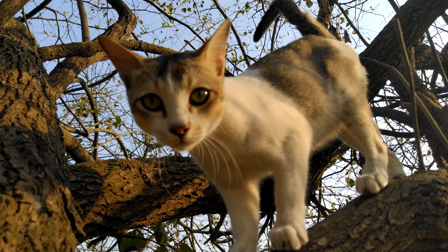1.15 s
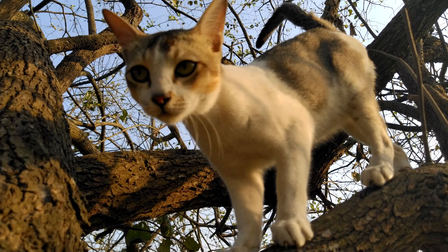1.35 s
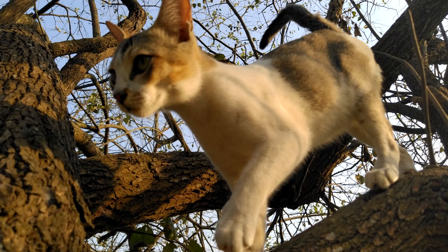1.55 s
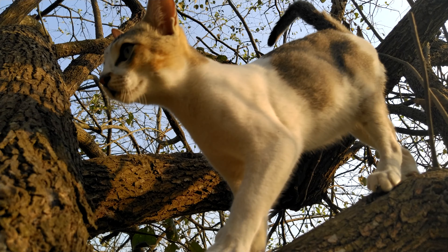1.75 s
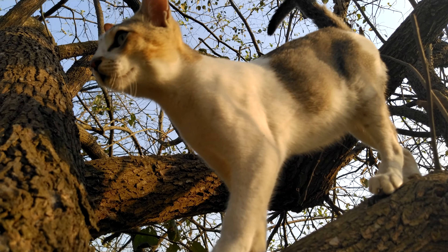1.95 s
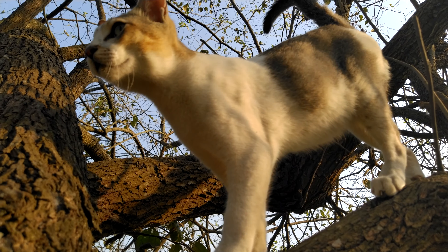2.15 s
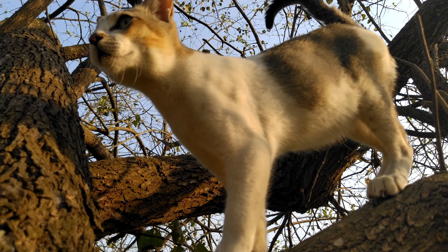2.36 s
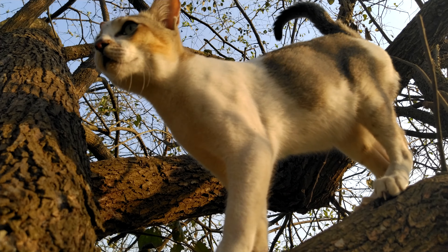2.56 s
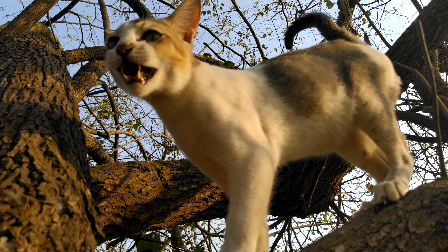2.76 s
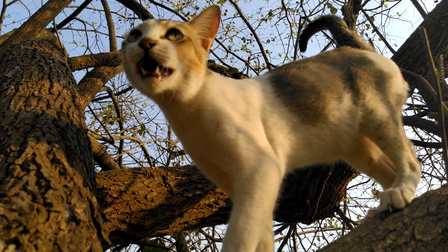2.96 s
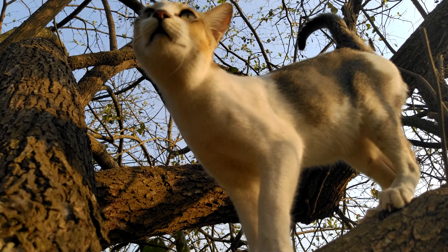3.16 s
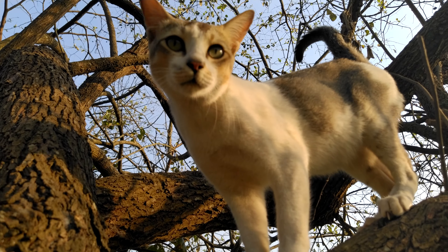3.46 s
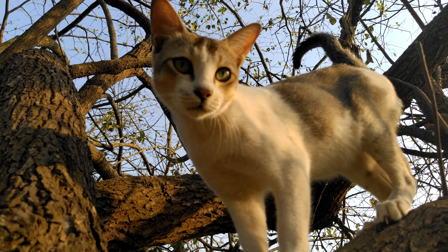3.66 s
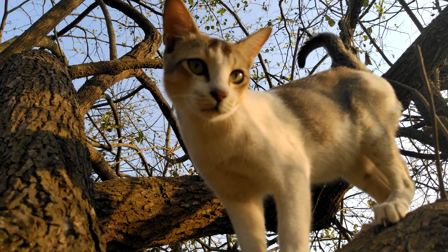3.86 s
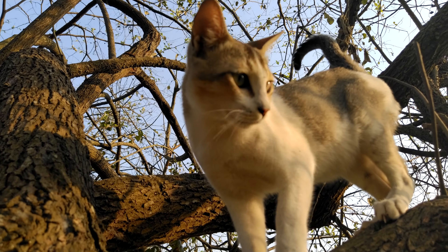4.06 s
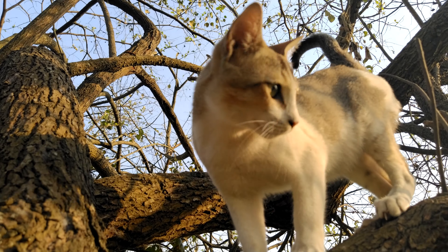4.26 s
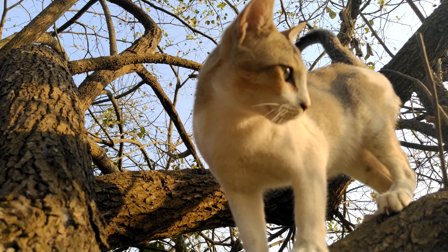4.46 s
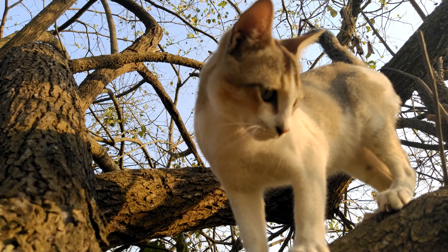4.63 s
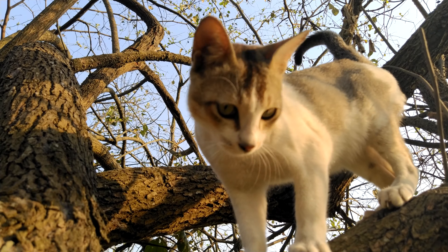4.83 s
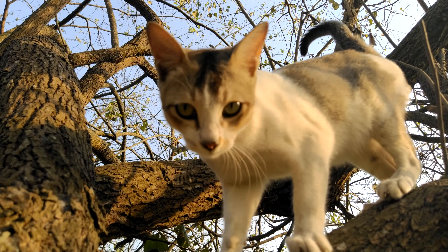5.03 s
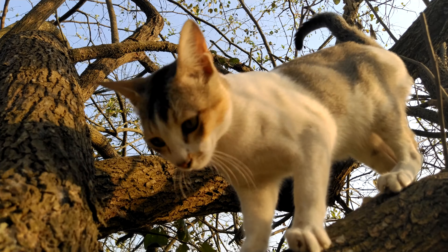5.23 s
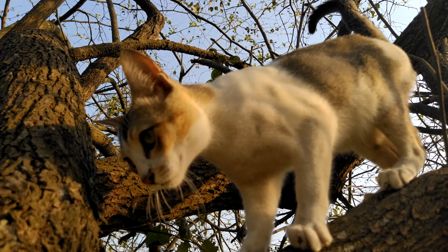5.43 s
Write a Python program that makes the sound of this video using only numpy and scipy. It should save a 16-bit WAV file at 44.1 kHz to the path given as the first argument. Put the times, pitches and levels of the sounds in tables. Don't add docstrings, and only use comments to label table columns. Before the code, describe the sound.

Claws scrape and snap dry bark close by, a paw thuds, then one short rising meow amid faint bird trills and soft open air.

```python
import sys
import numpy as np
from scipy import signal
from scipy.io import wavfile
from scipy.ndimage import uniform_filter1d

SR = 44100
rng = np.random.default_rng(int(sys.argv[2]) if len(sys.argv) > 2 else 0)


def persist_wave(psi):
    counts = np.round(np.clip(psi, -1, 1) * 32767).astype(np.int16)
    wavfile.write(sys.argv[1], SR, np.atleast_2d(counts).T)


def invert_db(level):
    return 10 ** (np.asarray(level, dtype=float) / 20)


N = 246519
TIME = np.arange(N) / SR

# [start_s, level_db]
RUSTLE = [(0.0, -46.5), (0.15, -64), (0.34, -64.5), (0.4, -52), (0.56, -54), (0.61, -54), (0.75, -56.5),
          (0.89, -60), (1.09, -68), (1.2, -72.5), (1.51, -73), (1.87, -77.5), (5.59, -81)]
# [centre_hz, width_hz, level_db]
BRIGHT_MODES = [(9900, 1040, -4.5), (7400, 2000, -10), (11100, 1600, -4.5), (4970, 2300, -9)]
# [centre_hz, width_hz, level_db]
BARK_MODES = [(2315, 2100, 4), (3100, 1740, 8), (4380, 3800, -14), (1470, 490, 3)]


def curves(table):
    s, *columns = np.transpose(table)
    return [np.interp(TIME, s, c) for c in columns]


def along(points, hz):
    f, v = np.transpose(points)
    return np.interp(np.log(hz), np.log(f), v)


def ring(x, hz, width_hz):
    return signal.lfilter(*signal.iirpeak(hz, hz / width_hz, fs=SR), x)


def rings(x, modes):
    return sum((-1) ** k * invert_db(db) * ring(x, hz, width_hz) for k, (hz, width_hz, db) in enumerate(modes))


def walk(rate_hz):
    hold = int(SR / rate_hz)
    steps = np.repeat(rng.standard_normal(N // hold + 1), hold)
    return 1.3 * uniform_filter1d(uniform_filter1d(steps, hold), hold)[:N]


def add(out, start_s, sound):
    i = max(int(start_s * SR), 0)
    out[:, i:i + sound.shape[-1]] += sound[..., :N - i]


def echoes(x, t60_s, wet_db):
    t = np.arange(int(t60_s * SR)) / SR
    tail = rng.standard_normal((2, len(t))) * invert_db(-60 * t / t60_s) * (t > .003)
    tail = tail / np.sqrt(np.sum(tail[0] ** 2))
    return x + invert_db(wet_db) * signal.fftconvolve(x, tail, axes=1)[:, :N]


def stray_flakes():
    chance = rng.standard_normal((60, 3))
    times_s = np.sort(rng.uniform(0, 1.1, size=len(chance)))
    effort_db = np.interp(times_s, *np.transpose(RUSTLE))
    return [(s, db + 20 + 5 * a, -18 + 6 * b, 9900 + 800 * c)
            for s, db, (a, b, c) in zip(times_s, effort_db, chance)]


def snap(t, peak_db, woody_db, flake_hz):
    shade_db = 12.5 + rng.standard_normal()
    slips_s = np.append([.003, .0012], rng.uniform(0.00383, 0.00698, size=3))
    sizes = np.append(1, invert_db(-17 + 3 * rng.standard_normal(size=4)))
    since_s = np.maximum(t[:, None] - slips_s, 0)
    force = (np.minimum(since_s / 0.00014, 1) * np.exp(-since_s / 0.00047)) @ sizes
    jolt = ((since_s > 0) * np.exp(-since_s / 0.00005)) @ sizes
    tear = force * rng.standard_normal((3, len(t)))
    crisp = rings(tear[:2], BRIGHT_MODES + [(flake_hz, 1100, 4)])
    woody = rings(jolt + 0.25 * tear[2], BARK_MODES)
    crisp[1] = signal.lfilter(*signal.butter(4, 9000, fs=SR), crisp[1])
    crisp_db = np.array([[peak_db], [peak_db - shade_db]])
    crisp = crisp / np.abs(crisp).max(axis=1, keepdims=True) * invert_db(crisp_db)
    woody = woody / np.abs(woody).max() * invert_db(peak_db + woody_db)
    return crisp + [woody, -invert_db(-.3 * shade_db) * np.roll(woody, 7)]


def thud(t, peak_db):
    modes = ((426, 0.0067, 0.11), (546, 0.0018, 0.8), (805, 0.0011, 0.7))  # hz, decay_s, size
    limb = sum(size * np.exp(-t / decay_s) * np.sin(2 * np.pi * hz * t) for hz, decay_s, size in modes)
    return invert_db(peak_db) * np.minimum(t / 0.00055, 1) * np.array([limb, 0.96 * np.roll(limb, 4)])


def claws():
    # [start_s, peak_db, woody_db re peak, flake_hz]
    snaps = [(0.0002, -25.5, -15.5, 11500), (0.017, -28, -31, 8350), (0.026, -29, -37, 10600),
             (0.0424, -27, -7, 8400), (0.055, -21.5, -9.5, 10200), (0.072, -14.5, -26, 8700),
             (0.0978, -9.5, -20.5, 9900), (0.1136, -9, -17.5, 10600), (0.1584, -26.5, -12.5, 9800),
             (0.1935, -33.5, -30, 10100), (0.243, -35.5, -9.5, 9900), (0.3024, -38, -29, 9300),
             (0.326, -34, -16, 10200), (0.3497, -31.5, -11, 10000),
             (0.3864, -31.5, -6.5, 10600), (0.396, -21, -29, 9350), (0.4225, -40, -23, 10200),
              (0.4611, -3.5, -12, 9900), (0.4729, -13, -26, 10200), (0.4947, -25.5, -12.5, 9600),
              (0.506, -31, -9, 9500), (0.542, -27.5, -27, 10600), (0.5486, -22.5, -7, 9900),
              (0.589, -26.5, -21, 7400), (0.6354, -28, -9, 10000), (0.6505, -25, -8.5, 9100),
              (0.656, -28, -18, 9700), (0.678, -16.5, -22, 9600), (0.6831, -23.5, -29, 10000),
              (0.712, -25.5, -17, 10500), (0.734, -16, -24, 7400), (0.7455, -14, -15.5, 9900),
              (0.7595, -24.5, -17, 9400), (0.7653, -25.5, -8.5, 8950), (0.7937, -31.5, -14, 6660),
              (0.878, -30.5, -31, 6600), (0.893, -27.5, -7.5, 7900), (0.926, -35.5, -12, 9400),
              (0.94, -34.5, -8.5, 10000), (0.9703, -19.5, -46, 10500), (0.9991, -30, -22, 9100),
              (1.0719, -36, -27, 9450),
             (1.316, -40, -34, 10600), (1.4079, -26.5, -18, 10000), (1.469, -30.5, -43, 10200),
              (1.53, -24, -50, 9900), (1.577, -37.5, -21, 7270), (1.6093, -36, -27, 10400),
              (1.614, -33.5, -27, 9900), (1.749, -39.5, -18, 10100), (2.3695, -42, -10, 10000),
              (2.457, -37.5, -25, 8500), (2.67, -34, -30, 9800), (3.6338, -45, -24, 10500),
              (3.6905, -44, -19, 10000), (2.846, -37, -27, 9600), (2.8652, -34.5, -35, 8650),
              (2.9981, -37, -29, 11510), (3.3738, -34, -28, 10700), (3.7915, -39, -24, 8400),
              (3.821, -41, -16, 11500), (3.8543, -30, -25, 10500), (3.8616, -22.5, -30, 11100),
              (3.9417, -20.5, -24.5, 10230), (4.5349, -39.5, -11, 10100), (4.7508, -40.5, -24, 8500),
              (4.7598, -39, -26, 5800), (4.9717, -44.5, -6.5, 9200), (5.2117, -38.5, -11, 8160)]
    # [start_s, peak_db]
    thuds = [
        (0.041, -43),
        (0.113, -49),
        (0.4589, -23.5),
        (0.548, -44.5),
        (.745, -48),
    ]
    out, t = np.zeros((2, N)), np.arange(700) / SR
    for s, peak_db, woody_db, flake_hz in snaps + stray_flakes():
        add(out, s - .0033, snap(t, peak_db, woody_db, flake_hz))
    for s, peak_db in thuds:
        add(out, s, thud(t, peak_db))
    highpass = signal.butter(3, 300, "highpass", fs=SR, output="sos")
    return echoes(signal.sosfilt(highpass, out), .07, -16)


def brushed(base_db, column):
    # [start_s, length_s, crisp_db, woody_db]
    brushes = [
        (2.369, 0.54, -65.5, -69),
        (3.071, 0.38, -66.5, -72),
        (3.447, 0.15, -77, -78),
        (3.77, 0.13, -68, -80),
        (4.188, .33, -76.5, -69.5),
        (4.63, 0.17, -70.5, -83),
        (4.957, 0.5, -72.5, -74.5),
    ]
    attack_s, release_s = 0.045, 0.055
    power = invert_db(2 * base_db)
    for row in brushes:
        start_s, end_s = row[0], row[0] + row[1]
        shape = np.clip(np.minimum((TIME - start_s) / attack_s, (end_s - TIME) / release_s), 0, 1)
        power = power + invert_db(2 * row[column]) * shape ** 2
    return 10 * np.log10(power)


def rustle():
    crisp_db, = curves(RUSTLE)
    woody_db = -72.5 + 0.79 * (crisp_db + 65.5)
    crisp_db, woody_db = brushed(crisp_db, column=2), brushed(woody_db, column=3)
    effort = np.clip((crisp_db + 68) / 12, .15, 1)
    crisp_modes = BRIGHT_MODES[::2] + [(7400, 2500, -7)]
    out = 0
    for modes, db, right_db in ((crisp_modes, crisp_db + 5.5, -9), (BARK_MODES, woody_db + 3.5, -3)):
        size = (rng.random(N) < 600 / SR) * invert_db(3.1 * np.minimum(rng.exponential(size=N), 3.2))
        grains = uniform_filter1d(uniform_filter1d(size, size=20), size=20) * 25 * effort + .22
        sound = rings(grains * rng.standard_normal((2, N)), modes)
        sound = sound / np.sqrt(uniform_filter1d(sound ** 2, size=8000))
        out = out + sound * invert_db(db + 1.5 * walk(30) + [[0], [right_db]])
    return out


def air():
    # [centre_hz, density_db per Hz]
    spectrum = [(25, -7), (50, -5.5), (75, 2), (160, -8), (320, -9.5), (550, -17.5), (850, -11.5),
                (1900, -18.5), (2450, -12), (3300, -27.5), (4400, -27), (8000, -25), (10600, -20),
                (12500, -40)]
    # [centre_hz, correlation]
    likeness = [(60, 0.8), (130, 0.78), (280, 0.39), (590, 0.76), (1280, 0.039), (2750, -0.15),
                (5900, 0.24), (12700, -0.23)]
    out, swell = 0, walk(0.96)
    for hz in 28 * 2 ** np.arange(0, 8.9, 1 / 3):
        band = signal.butter(2, [hz / 1.12, hz * 1.12], "bandpass", fs=SR, output="sos")
        mid, side = signal.sosfilt(band, rng.standard_normal((2, N)))
        like = np.clip(along(likeness, hz), -.9, .95)
        db = along(spectrum, hz) + 0.48 * swell + 2.83 * walk(6) + np.array([[.4], [-.4]])
        stereo = np.sqrt(1 + like) * mid + np.sqrt(1 - like) * side * np.array([[1], [-1]])
        out = out + invert_db(db) * stereo
    hum = invert_db(-69.5 + 1.1 * walk(4.84)) * np.sin(2 * np.pi * 50.5 * TIME)
    return out / out.mean(axis=0).std() * invert_db(-62) + hum


def far_tone(hz, size, level_db):
    phase_rad, port_db = np.array([[0], [1.8]]), np.array([[5], [1.5]])
    return invert_db(level_db + port_db) * size * np.sin(2 * np.pi * np.cumsum(hz) / SR + phase_rad)


def progress(length_s):
    return np.arange(int(length_s * SR)) / (length_s * SR)


def pulsed(length_s, start_hz, end_hz, rate_hz, level_db):
    u = progress(length_s)
    rasp = 1 + start_hz / 1200 * uniform_filter1d(rng.standard_normal(len(u)), size=30)
    sharpness = 2 if rate_hz > 40 else 10
    throb = np.sin(np.pi * rate_hz * length_s * u) ** sharpness * np.sin(np.pi * u) ** 0.11
    return far_tone(start_hz + (end_hz - start_hz) * u, rasp * throb, level_db)


def birds():
    # [start_s, length_s, start_hz, end_hz, level_db]
    whistles = [(0.016, 0.03, 1304, 993, -57.5), (2.123, 0.068, 3100, 2560, -64),
                (2.134, 0.064, 980, 987, -68.5), (2.878, 0.0098, 8800, 7860, -57),
                (2.926, 0.057, 2096, 1640, -60), (2.078, 0.048, 3300, 3680, -70),
                (3.062, 0.086, 2495, 2590, -61), (3.139, 0.03, 2640, 3050, -70),
                (3.21, 0.029, 2370, 2190, -68), (3.34, 0.057, 2230, 2160, -69),
                (3.463, 0.038, 2550, 2690, -69.5), (3.722, 0.11, 2190, 2197, -73),
                (4.16, 0.035, 2830, 3010, -68), (4.262, 0.027, 2560, 3020, -73),
                (5.423, 0.16, 2500, 2386, -73.5), (5.54, 0.08, 3130, 3290, -69)]
    # [start_s, length_s, lowest_hz, level_db]
    scoops = [
        (0.94, 0.12, 2175, -62),
        (3.982, 0.055, 2760, -66.5),
        (4.392, 0.1, 2303, -57),
        (5.083, .031, 4600, -63),
        (5.2, 0.098, 2214, -62),
    ]
    triple_starts = [1.608, 2.385, 3.151, 3.91, 4.665, 5.418]
    # [delay_s, start_hz, end_hz, level_db]
    triple = [
        (0, 1234, 896, -65),
        (.08, 1233, 787, -62),
        (0.157, 1200, 865, -59.5),
    ]
    # [start_s, length_s, start_hz, pulse_hz, level_db]
    trills = [
        (1.052, 0.066, 4670, 75, -56.5),
        (1.893, 0.045, 2464, 260, -56.5),
        (2.392, 0.1, 2630, 150, -57),
        (2.57, 0.13, 2740, 220, -53),
        (2.826, 0.108, 2327, 67.5, -56.5),
        (5.138, .066, 3450, 54, -66),
        (5.395, 0.039, 2480, 246, -51.5),
    ]
    out, waver = np.zeros((2, N)), walk(130)
    glides = [(s, length_s, a, a + 0.645 * (b - a), b, db) for s, length_s, a, b, db in whistles]
    glides += [(s, length_s, 1.14 * hz, hz, 1.2 * hz, db) for s, length_s, hz, db in scoops]
    glides += [(s + delay_s, .035, a, (a + b) / 2, b, db)
               for s in triple_starts for delay_s, a, b, db in triple]
    for s, length_s, start_hz, middle_hz, end_hz, db in glides:
        u = progress(length_s)
        hz = start_hz * (1 - u) * (1 - 2 * u) + 4 * middle_hz * u * (1 - u) + end_hz * u * (2 * u - 1)
        size = invert_db(3 * np.resize(waver[int(s * SR):], len(u))) * np.sin(np.pi * u) ** .3
        add(out, s, far_tone(hz, size, db))
    for s, length_s, hz, pulse_hz, db in trills:
        add(out, s, pulsed(length_s, hz, 0.94 * hz, pulse_hz, db))
    return echoes(out, .25, -8)


def meow():
    # [start_s, pitch_hz, level_db, jaw_opening 0-1, mouth_ring_db re level]
    call = [
        (2.36, 333.6, -68, .2, -15),
        (2.389, 344, -57.5, 0, -14),
        (2.452, 411, -50, 0.07, -18),
        (2.464, 421, -45, 0.52, -10),
        (2.515, 445, -46.5, 0.88, -3.5),
        (2.599, 439.3, -50.5, 0.93, 0.3),
        (2.75, 467.2, -48.3, 1, -6),
        (2.826, 477, -46.5, 1.01, -18),
        (2.857, 383, -64.5, 0.26, -10),
    ]
    # [centre_hz, gain_db]
    partial_gain = [(1200, -2.5), (1800, 1.5), (2250, 10.5), (2750, 5), (3200, 10), (3650, -3.5), (4100, -21),
                    (4750, -4), (5600, -2), (7100, 0), (8000, -14), (9500, -3), (12000, -37)]
    start_s, end_s = call[0][0], call[-1][0]
    hz, level_db, jaw, ring_db = curves(call)
    first_db = level_db - 8.5 * jaw + 3.0
    second_db = level_db - 13 * (1 - jaw) + 4.5
    opening = 0.736 + 0.23 * jaw
    pan_db = np.clip(59 * (TIME - 2.606), -5, 9)
    settle_s, break_s = 0.072, 0.013
    rough = 0.07 + np.exp(-np.abs(TIME - start_s) / settle_s) + np.exp(-np.abs(end_s - TIME) / break_s)
    gate = np.clip(np.minimum(TIME - start_s, end_s - TIME) / 0.0039, 0, 1)
    jitter = 0.00188 * walk(60) + 0.0604 * np.maximum(rough - .15, 0) * walk(150)
    phase = 2 * np.pi * np.cumsum(hz * (1 + jitter)) / SR
    low = invert_db(first_db) * np.sin(phase) + invert_db(second_db) * np.sin(2 * phase + 1)
    partials = []
    for k in range(3, 27):
        gain_db = along(partial_gain, k * hz / opening) + (1 + k / 6) * walk(25)
        partials.append(invert_db(gain_db) * np.sin(k * phase + k * k))
    mouth = sum(partials[:5]) * invert_db(np.array([pan_db, -pan_db]) / 2)
    breath_modes = BRIGHT_MODES + [(4900, 1200, -3), (6200, 1500, -2)]
    breath = (1 + np.sin(phase)) * rings(rng.standard_normal((2, N)), breath_modes) * invert_db(-13)
    upper = sum(partials[5:])
    edge = np.array([upper, np.roll(upper, 16)]) + breath
    high = invert_db(level_db + ring_db - 4.0) * (mouth + invert_db(-2.5) * edge)
    flutter = gate * np.maximum(1 + 0.73 * rough * walk(120), 0)
    left = np.roll(flutter * (invert_db(-0.5) * low + high[0]), 6)
    right = flutter * (invert_db(-1.0) * low - np.roll(high[1], -11))
    return echoes(np.array([left, right]), .15, -17)


def insect():
    # [start_s, length_s, level_db]
    buzzes = [
        (3.128, 0.24, -68),
        (3.459, 0.21, -66.5),
        (4.89, 0.26, -66),
        (5.5, .06, -72.5),
    ]
    out, hz = np.zeros((2, N)), 7540
    for s, length_s, db in buzzes:
        add(out, s, pulsed(length_s, hz, 1.03 * hz, 29.8, db))
    return echoes(out, .25, -8)


def scene():
    return claws() + rustle() + air() + birds() + meow() + insect()


def low_pass(x):
    return signal.sosfilt(signal.butter(12, 15400, fs=SR, output="sos"), x)


def record(dry):
    port = signal.ellip(6, .5, 28, 12000, fs=SR, output="sos")
    return low_pass(signal.sosfilt(port, dry))


dry = scene()
out = record(dry)
persist_wave(out)
```